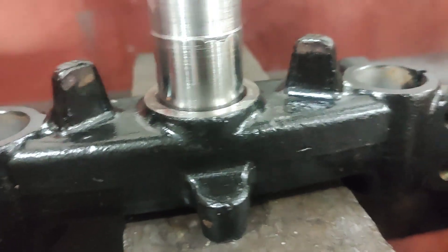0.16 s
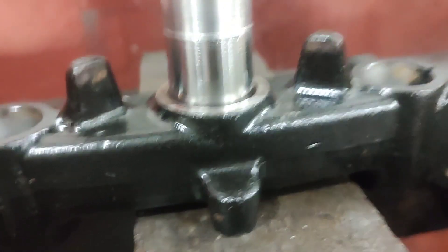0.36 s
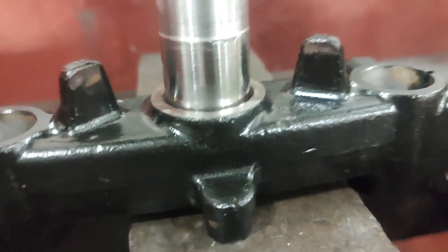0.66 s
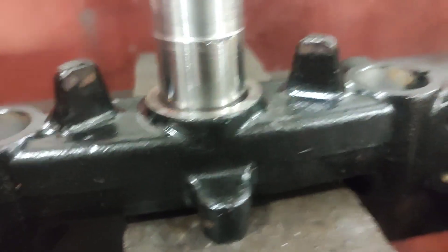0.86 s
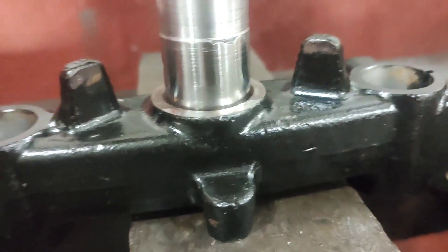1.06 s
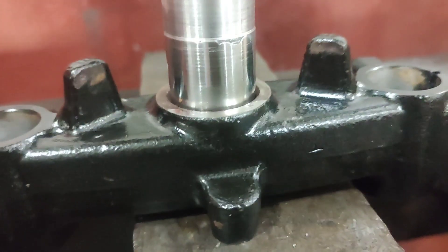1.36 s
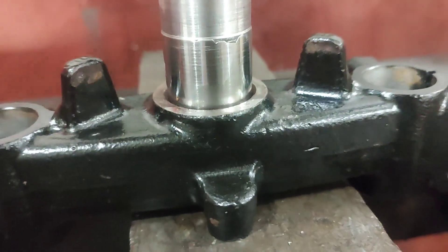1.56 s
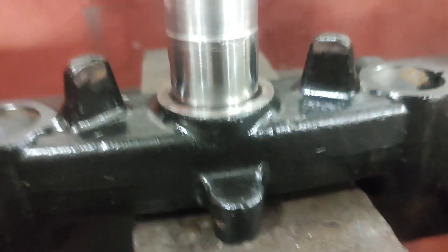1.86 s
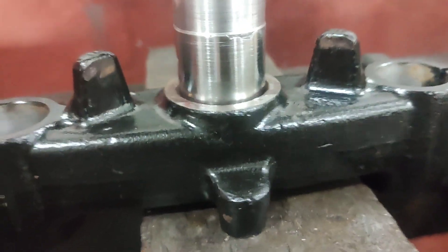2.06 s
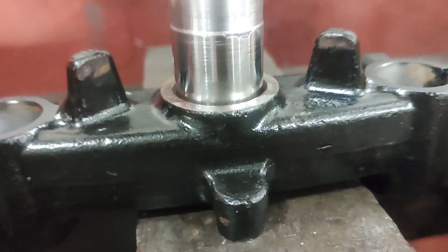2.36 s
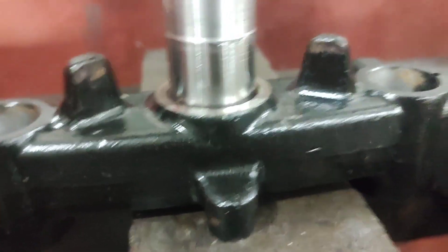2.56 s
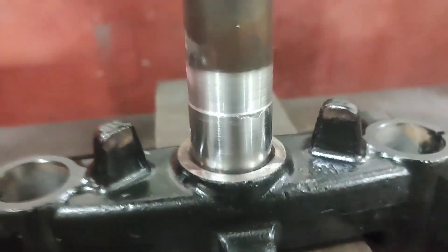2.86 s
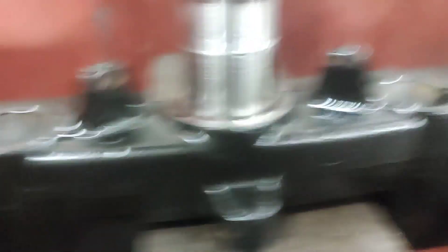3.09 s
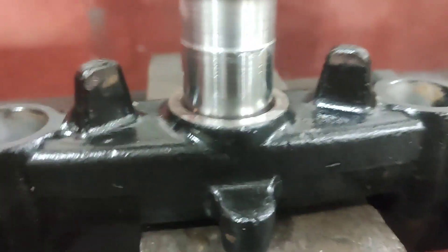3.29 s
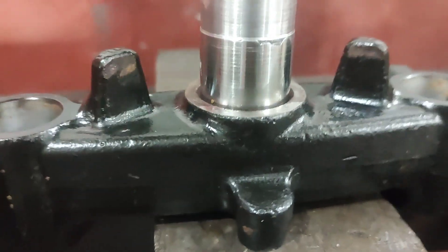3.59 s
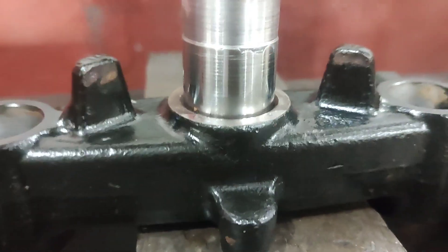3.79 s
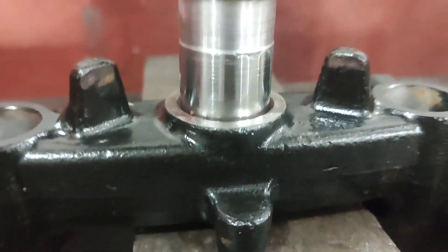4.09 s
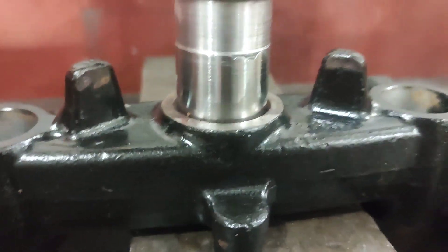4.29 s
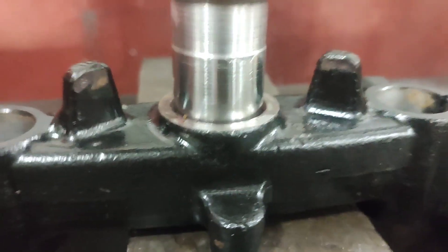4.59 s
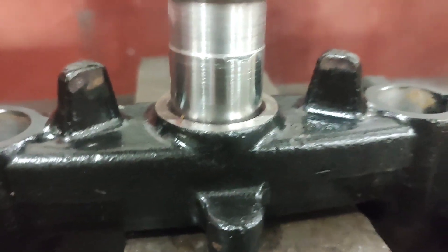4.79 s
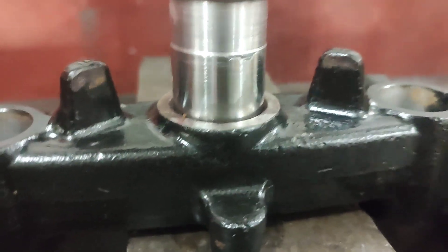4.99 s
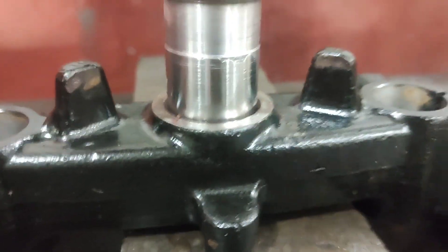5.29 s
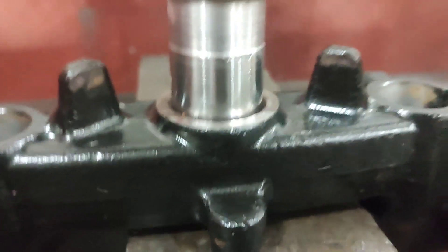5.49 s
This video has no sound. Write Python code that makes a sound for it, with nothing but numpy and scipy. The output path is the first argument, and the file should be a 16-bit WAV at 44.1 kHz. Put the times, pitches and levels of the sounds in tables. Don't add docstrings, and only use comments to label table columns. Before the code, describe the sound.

Steady metallic clack-crunch from a manually pumped press, heard near a phone in a reverberant shop. A slack tick leads into bright chattering clicks and a brief grinding shudder with a soft boom; a pipe handle then knocks its stop, hardest around the middle of the clip. Small stray ticks and wet rubbing fill the gaps over quiet drone, unsteady mains hum and rumble.

```python
import sys
import numpy as np
from scipy import signal
from scipy.fft import rfft, irfft, next_fast_len
from scipy.io import wavfile
from scipy.ndimage import uniform_filter1d

SR = 44100
rng = np.random.default_rng(int(sys.argv[2]) if len(sys.argv) > 2 else 0)


def store_wav(level_fs):
    pcm = np.round(np.clip(np.atleast_2d(level_fs), -1, 1) * 32767)
    wavfile.write(sys.argv[1], SR, pcm.T.astype(np.int16))


def field_ratio(decibels):
    return 10 ** (np.asarray(decibels, dtype=float) / 20)


N = 249165


def read(table, hz):
    table_hz, value = np.transpose(table)[:2]
    return np.interp(np.log(hz + 1), np.log(table_hz + 1), value)


def shape(x, gain_at):
    size = next_fast_len(x.shape[-1])
    return irfft(rfft(x, size) * gain_at(np.fft.rfftfreq(size, 1 / SR)), size)[..., :x.shape[-1]]


def unit(x):
    return x / np.sqrt(np.mean(x ** 2))


def band(x, lo_hz, hi_hz):
    return signal.sosfilt(signal.butter(2, [lo_hz, hi_hz], "band", fs=SR, output="sos"), x)


def add(out, s, sound):
    i = int(s * SR)
    out[..., i:i + sound.shape[-1]] += sound[..., :N - i]


def walk(rate):
    k = int(SR / rate)
    held = np.repeat(rng.standard_normal(N // k + 1), k)
    return uniform_filter1d(uniform_filter1d(held, k), k)[:N]


def ring(modes, seconds, scatter_db, detune, spread):
    hz, db, t60 = np.transpose(modes)[:, :, None]
    t = np.arange(int(seconds * SR)) / SR
    chance = rng.standard_normal((3, len(modes), 1))
    phase = 2 * np.pi * hz * (1 + detune * chance[0]) * t
    contact = 1 - np.exp(-t / 0.00065)
    size = field_ratio(db + scatter_db * chance[1]) * np.exp(-np.log(1000) * t / t60) * contact
    return np.array([np.sum(size * np.sin(phase + side * spread * chance[2]), axis=0) for side in (1, -1)])


def crack(low_db, high_db, pan_db):
    t = np.arange(int(.04 * SR)) / SR
    rise_s, tail_s = 0.002, 0.025
    u = t / rise_s
    swell = (u * np.exp(1 - u)) ** 2 + 0.26 * np.minimum(u, 1) * np.exp(-t / tail_s)
    chatter = rng.standard_normal(len(t)) + 1.15 * rng.standard_normal((2, len(t)))
    chatter = 0.31 * chatter * swell
    middle = band(band(chatter, 3300, 7700), 2500, 7900)
    low = band(chatter, 1400, 3500)
    high = band(band(chatter, 10000, 14500), 9800, 15000)
    high = .5 * high + band(high, 10200, 11200) + band(high, 12300, 13500)
    return field_ratio(0.43 * np.array([[pan_db], [-pan_db]])) * middle + field_ratio(low_db) * low + field_ratio(high_db) * high


def rush(u):
    swell = np.minimum(u / 0.46, 1) ** 1.07 * np.exp(-u)
    lump = int(.005 * SR)
    swell = swell * field_ratio(1.4 * np.sqrt(lump) * uniform_filter1d(rng.standard_normal(len(u)), lump))
    size = field_ratio(2.5 * np.minimum(rng.exponential(size=len(u)), 2))
    struck = rng.random(len(u)) < 3500 / SR
    jolts = rng.standard_normal(len(u)) * size * struck
    return swell, unit(jolts * swell)[None]


# frequency in Hz, level in dB per Hz
GRIT_COLOUR = [(180, 0), (300, -38), (560, 3.5), (706, -3), (1410, 5), (1630, 0.5), (2760, 3), (4600, -7.5),
               (7170, -18), (8740, -28), (10800, -32), (13900, -29), (15300, -48)]


def grind(swell, jolts, lo_hz):
    grains = jolts + 4 * swell * rng.standard_normal((2, len(swell)))
    return band(unit(shape(grains, lambda hz: field_ratio(read(GRIT_COLOUR, hz)))), lo_hz, 13000)


def valve_hiss(u):
    noise = band(band(rng.standard_normal((2, len(u))), 12450, 13000), 12400, 13050)
    return unit(np.minimum(u / 0.28, 1) * np.exp(-u / 3.5) * noise)


# frequency in Hz, level in dB, t60 in seconds
FRAME_MODES = [(250, -15.5, .15), (303.8, -7.5, 0.24), (383.4, -9.5, 0.17), (452, -8, 0.1), (503, -6, 0.12),
               (539, -2.5, 0.11), (609, -4.5, 0.087), (722.6, -7.5, 0.1), (810.4, 1, 0.063),
               (898, -2, 0.059), (1019, -0.5, 0.1), (1107, -5, 0.06), (1225, -2.5, 0.049),
               (1338, -4, 0.086), (1455, 1, 0.053)]


def frame_shudder(jolts, tilt_db):
    modes = [(hz, db + tilt_db * np.log2(hz / 700), 0.86 * t60) for hz, db, t60 in FRAME_MODES]
    return unit(signal.fftconvolve(jolts, ring(modes, .3, 1.5, .012, .45), axes=1))


def frame_roar(u):
    noise = band(rng.standard_normal(len(u)), 126.0, 203.7)
    return unit(np.minimum(u / 1.52, 1) ** 2 * np.exp(-u / 2.53) * noise)


# frequency in Hz, level in dB, t60 in seconds
BED_MODES = [(123, -3, 0.17), (169.6, -7, 0.17), (193.9, -0.5, 0.18), (213, -4.5, 0.19), (258, -25, .15)]


def bed_boom(boom_hz, low_db, upper_db):
    bed = [(hz, db + low_db * (k == 0) + upper_db * (k > 1), t60) for k, (hz, db, t60) in enumerate(BED_MODES)]
    push = np.hanning(int(.008 * SR))[None]
    modes = [(boom_hz, 2, .18), (.92 * boom_hz, -3, .12)] + bed
    boom = signal.fftconvolve(push, ring(modes, .3, 1.5, .01, .3), axes=1)
    boom = boom * (1 - np.exp(-np.arange(boom.shape[1]) / SR / .025))
    return unit(band(band(boom, 115.4, 274), 80, 420))


# start in seconds, peak in dB, 8-15 kHz part in dB,
# pin pitch in Hz, seal rub of the push in dB
BITES = [
    (0.2332, -16, -1.5, 5200, -45),
    (0.9546, -18.5, -13, 5430, -48.5),
    (1.6906, -13.5, -5.5, 7040, -44),
    (2.3702, -12.5, -5.5, 7560, -41),
    (3.08, -18.5, 6.5, 7130, -44.5),
    (3.8264, -7.5, -2, 7490, -40.5),
    (4.513, -13, -12, 2830, -44),
    (5.2078, -16, -2.5, 7290, -43),
]
# start in seconds, peak in dB, pin pitch in Hz,
# grit in dB, rattle in dB
RETURNS = [
    (0.6212, -25, 3190, -67, -30),
    (1.3432, -27.5, 3260, -57.5, -30.5),
    (2.0385, -24.5, 3290, -53, -37),
    (2.7163, -31.5, 2500, -57.5, -56),
    (4.1816, -24, 3380, -54, -41),
    (4.887, -27.5, 2750, -53.5, -52),
    (5.583, -21, 3350, -54, -32),
]
# start in seconds, boom in Hz, boom in dB, grit in dB, length in seconds
LOADS = [
    (0.259, 160, -43.5, -46.5, 0.012),
    (0.971, 166.2, -43, -49.5, 0.03),
    (1.684, 156.7, -44, -50, 0.016),
    (2.388, 186, -43.5, -42, 0.02),
    (3.101, 150.5, -46, -45.5, 0.028),
    (3.825, 142.7, -46, -44, 0.016),
    (4.514, 145.5, -39, -41, 0.023),
    (5.226, 150.3, -43, -42.5, 0.022),
]
# frame shudder in dB, valve hiss in dB against the grit
LOAD_PARTS = [(-41.5, -20), (-43.5, -35), (-41, -8), (-41.5, -12), (-40.5, -28), (-43, -22), (-42.5, -18),
              (-42.5, -16)]
# shudder lag in seconds, frame tilt in dB per octave,
# boom lag in seconds, lowest bed mode in dB, upper bed modes in dB
LOAD_ANSWERS = [(.004, -2, 0.00774, 4.5, -1), (.004, 1.3, 0.00785, 4, -2), (.003, 0, 0.0147, 5.5, -12),
                (.004, -0.4, 0.00766, 2, 4), (.004, -0.8, 0.0082, -1, 6), (.004, -0.9, .008, 1.5, 2),
                (.004, -1.5, 0.0081, -5, -6), (.004, -1.1, 0.00794, 4, 9.5)]
USUAL_ANSWER = (0.00404, 0.3, 0.0081, 0.28, 0.3)
# start in seconds, boom in Hz, boom in dB
REBOUNDS = [
    (0.331, 157, -53),
    (1.049, 162.4, -56.5),
    (3.18, 196.6, -51),
    (4.70, 196, -60),
]
# start in seconds, shudder in dB, grit in dB, boom in dB
SLIPS = [
    (.405, -49, -54, -67),
    (1.13, -50, -53.5, -63),
    (1.659, -54, -50.5, -52.5),
    (1.857, -52.5, -57.5, -71),
    (4.06, -59, -56, -68),
    (5.39, -52.5, -59.5, -63),
    (0.451, -58.5, -58.5, -70),
    (2.587, -58.5, -61.5, -74),
    (2.652, -62, -57, -71),
    (4.69, -58.5, -64, -67),
]


def jolt_list():
    grind_hz, scrape_hz, slip_hz, slip_s = 150, 1700, 149, .013
    lesser = (-43, USUAL_ANSWER)
    rows = []
    for (s, hz, db, grit, length), (shudder, oil), answer in zip(LOADS, LOAD_PARTS, LOAD_ANSWERS):
        rows.append((s, hz, db, shudder, grit, length, grind_hz, oil, answer))
    for s, hz, db in REBOUNDS:
        rows.append((s, hz, db, db - 7, db - 38, 0.013, grind_hz, *lesser))
    for s, shudder, grit, boom in SLIPS:
        rows.append((s, slip_hz, boom, shudder, grit, slip_s, grind_hz, *lesser))
    for s, *_ in BITES:
        rows.append((s + .003, 198.5, -57.5, -53, -45.5, slip_s, scrape_hz, *lesser))
    for s, _, _, grit, _ in RETURNS:
        rows.append((s, slip_hz, -84, -70, grit, 0.011, grind_hz, *lesser))
    return rows


def thuds():
    out = np.zeros((2, N))
    for s, boom_hz, boom_db, shudder_db, grit_db, length, lo_hz, oil_db, answer in jolt_list():
        shudder_lag, tilt_db, boom_lag, low_db, upper_db = answer
        u = np.arange(int(.2 * SR)) / SR / length
        swell, jolts = rush(u)
        add(out, s, field_ratio(grit_db + 2) * grind(swell, jolts, lo_hz))
        add(out, s, field_ratio(grit_db + oil_db) * valve_hiss(u))
        add(out, s + shudder_lag, field_ratio(shudder_db - 2.5) * frame_shudder(jolts, tilt_db))
        add(out, s + 0.01422, field_ratio(shudder_db - 2) * frame_roar(u))
        add(out, s + boom_lag, field_ratio(boom_db) * bed_boom(boom_hz, low_db, upper_db))
    return out


BITE_LOWS_DB = [-8, 0, -1.5, -16, -7, -5.5, -6, -3]
# start in seconds, peak in dB, 8-15 kHz part in dB, pin pitch in Hz
CHATTER = [(.2053, -28, -15, 3150), (0.229, -24, -13, 6950), (0.948, -32, 2, 4370), (1.653, -22, -7, 3060),
           (1.6809, -18.5, -10, 2680), (2.3638, -24, 5, 6550), (2.99, -38, -26, 6460),
           (3.09, -14, -7, 2720), (3.708, -32, -2.5, 4700), (3.741, -29, -9, 3300),
           (3.7994, -21.5, -4, 5300), (4.4937, -32, -22, 2780), (4.504, -32, -27, 4300),
           (5.2, -33, -12, 2790), (3.826, -15, -4, 5460)]
# start in seconds, peak in dB, pin pitch in Hz
TAPS = [(0.407, -39, 3190), (1.123, -40, 3130), (1.856, -38, 2780), (1.97, -43, 2670), (2.5879, -39, 2590),
        (2.651, -36.5, 2660), (2.342, -36, 3180), (4.786, -41.5, 3250), (3.344, -45, 2920),
        (4.061, -36, 3270), (5.4816, -36.5, 3360)]
# start in seconds, peak in dB, 8-15 kHz part in dB, pin pitch in Hz
STRAYS = [(.002, -43.5, -1, 6340), (0.451, -31, -7, 2580), (.605, -40, 1, 5300), (0.7403, -40.5, -26, 6550),
          (1.192, -36, -9, 3300), (1.285, -20, -14, 3470), (1.567, -40.5, -23, 2550),
          (2.803, -40.5, -2, 6940), (4.997, -31, -13, 3200), (4.087, -35.5, -20, 6710),
          (4.8133, -35.5, -21, 7060), (5.4355, -36, -7, 6750), (.529, -56, 5, 6500), (.578, -57, -26, 2700),
          (2.649, -40, -15, 5250), (4.847, -42, -20, 2920), (5.2325, -31, -12, 2800),
          (0.259, -23, -12, 2830)]
# start in seconds, peak in dB,
# 8-15 kHz part in dB, pin pitch in Hz
SNAPS = [
    (.616, -36.5, 5, 5800),
    (1.336, -39, 6, 5700),
    (2.032, -36, 4, 5330),
    (4.174, -36.5, 9, 5550),
    (4.8795, -37, 10, 5900),
    (5.575, -42, 6, 5450),
]


def ticks():
    rows = [(s, db, low, high, hz, -2) for (s, db, high, hz, _), low in zip(BITES, BITE_LOWS_DB)]
    rows += [(s, db, -18, high, hz, -0.5) for s, db, high, hz in CHATTER]
    rows += [(s, db, -25, -10.5, hz, 2) for s, db, hz, *_ in RETURNS]
    rows += [(s, db, 11, -18, hz, 6) for s, db, hz in TAPS]
    rows += [(s, db, -3, high, hz, 2) for s, db, high, hz in STRAYS + SNAPS]
    ring_db, t60, rise_s = -8.5, 0.026, 0.002
    out = np.zeros((2, N))
    for s, db, low_db, high_db, pin_hz, pan_db in rows:
        sound = crack(low_db + 1.5, high_db + 0.5, pan_db)
        sound = sound + field_ratio(-4) * band(sound, .85 * pin_hz, 1.15 * pin_hz)
        pin = ring([(pin_hz, ring_db, t60), (1.04 * pin_hz, ring_db - 4, t60)], .04, 1.5, .01, .6)
        rise = np.minimum(np.arange(pin.shape[1]) / SR / rise_s, 1)
        sound = sound + field_ratio(np.array([[pan_db], [-pan_db]]) / 2) * pin * rise
        add(out, s - .001, field_ratio(db) * sound)
    return out


# start in seconds, peak at 3.5-8 kHz in dB,
# 1.2-3.5 kHz part in dB, pin ring in dB, ring slope in dB per mode
CATCHES = [
    (0.151, -20, -5.5, -7, 1.5),
    (0.8731, -17, -16, -6.5, 3.5),
    (1.591, -19, 1, -6, 2.5),
    (2.2961, -24.5, -0.5, -8.5, 3.5),
    (3.0059, -17, 4.5, -11, 4.5),
    (3.7248, -22.5, 0.5, -8.5, 2),
    (4.4271, -20.5, -0.5, -7, 3.5),
    (5.138, -31.5, 12, -5, 4),
]
# frequency in Hz, width in Hz (not played), level in dB
SOCKET_PIN = [(1845, 137, 0.5), (2780, 106, 5.5), (4060, 100, 3.5), (5430, 105, -3), (6400, 160, -11),
              (7110, 87, -14)]
# start in seconds, level in dB, lower in Hz, upper in Hz
CATCH_TONES = [(0.1506, -17, 4040, 6440), (0.8724, -24, 3970, 6200), (1.5903, -25, 2785, 6270),
               (2.2967, -21.5, 2760, 4660), (3.0061, -20, 3170, 5300), (3.7244, -24, 4420, 7000),
               (4.4263, -21, 2820, 6850), (5.1367, -26, 2580, 7000)]


def catches():
    out, t60 = np.zeros((2, N)), .014
    for (s, db, low_db, ring_db, slope_db), (_, tone_db, lower_hz, upper_hz) in zip(CATCHES, CATCH_TONES):
        sound = crack(low_db, -18.5, 6)
        add(out, s - .001, field_ratio(db) * sound)
        modes = [(hz, mode_db + slope_db * k, t60) for k, (hz, _, mode_db) in enumerate(SOCKET_PIN)]
        add(out, s, field_ratio(db + ring_db - 7) * ring(modes, .04, 2.5, .04, .9))
        tones = [(lower_hz, 0, t60), (1.4 * lower_hz, -5, t60), (upper_hz, -2, t60)]
        add(out, s, field_ratio(tone_db - 5.5) * ring(tones, .04, 1, .003, .9))
        t = np.arange(sound.shape[1]) / SR
        add(out, s, field_ratio(db - 27.5) * np.sin(2 * np.pi * 970 * t) * np.exp(-t / 0.0019))
    return out


# frequency in Hz, t60 in seconds
HANDLE = [(2654, 0.072), (3910, 0.05), (5320, 0.04), (6830, 0.041)]
# frequency in Hz, level in dB against the mean main partial, t60 in seconds
HANDLE_MINOR = [(1630, 2, 0.017), (2130, 1, 0.0095), (3590, -1.5, 0.025), (5900, -25, 0.011),
                (8500, -19, 0.027), (10100, -22, 0.026), (12300, -16, 0.032), (13700, -21, .02)]
# start in seconds, level in dB of each of the four partials
KNOCKS = [
    (.537, -28.5, -36, -37, -49),
    (1.271, -28, -32, -26, -32),
    (2.0011, -36.5, -34.5, -43, -48),
    (2.682, -39, -31.5, -42, -50),
    (3.4136, -20, -17.5, -17, -21.5),
    (4.143, -26.5, -19.5, -27, -32),
    (4.831, -34.5, -42, -49, -44),
    (5.515, -31, -29, -22.5, -29),
]
# crack peak in dB, share of the free ring time, rebound delay in seconds,
# rebound in dB
LANDINGS = [
    (-56, 0.79, 0.0075, -13),
    (-28, .9, 0.0097, -4),
    (-33, 0.57, 0.015, -30),
    (-48, 0.38, 0.0074, -15),
    (-16, 0.91, 0.0097, -10),
    (-21.5, 0.29, .006, -12),
    (-50, 0.52, .015, -7),
    (-42, 0.85, 0.005, -7),
]


def knocks():
    cluster = ((1, 0.5), (1.017, -7.5), (.98, -10), (1.2, -17), (0.9, -15.5))
    out = np.zeros((2, N))
    for (s, *partial_db), (crack_db, share, delay, rebound_db) in zip(KNOCKS, LANDINGS):
        pairs = []
        for (hz, t60), db in zip(HANDLE, partial_db):
            pairs += [(hz * split, db + weak_db, share * t60) for split, weak_db in cluster]
        minor = [(hz, np.mean(partial_db) + db, t60) for hz, db, t60 in HANDLE_MINOR]
        for lag, db, tilt_db in ((0, 0, 0), (delay, rebound_db, -3.5)):
            modes = [(hz, mode_db + tilt_db * (hz / HANDLE[0][0] - 1) * 2, t60)
                     for hz, mode_db, t60 in pairs + minor]
            add(out, s + lag, field_ratio(db) * ring(modes, .1, .8, .003, .6))
            add(out, s + lag - .001, field_ratio(crack_db + db) * crack(-0.26, -15, 4.4))
    return out


def rattles():
    out = np.zeros((2, N))
    for s, _, hz, _, ring_db in RETURNS:
        for delay in np.cumsum(.007 * rng.random(7)):
            modes = [(hz * split, ring_db, .011) for split in (.82, .92, 1, 1.09, 1.2)]
            add(out, s + delay, np.exp(-delay / .025) * ring(modes, .04, 3, .02, .9))
    return out


LIFT_RUB_DB = -50


def rubbing(t):
    earlier = field_ratio(-51.5) * np.exp(-t / 0.1)
    power = field_ratio(-57.5) ** 2 + earlier ** 2
    for catch, bite, load, knock in zip(CATCHES, BITES, LOADS, KNOCKS):
        slack = uniform_filter1d(1. * (t > catch[0]) * (t < load[0]), size=900)
        u = np.maximum(t - load[0], 0)
        push = field_ratio(bite[4] + 6) * (1 - np.exp(-u / 0.0013)) * np.exp(-u / 0.1)
        lift = field_ratio(LIFT_RUB_DB) * np.exp(-((t - knock[0] - 0.058) / 0.1) ** 2)
        power = power + field_ratio(-51) ** 2 * slack + push ** 2 + lift ** 2
    return np.sqrt(power)


# low edge in Hz, high edge in Hz, level in dB
CLUMP_BANDS = [(500, 1130, -1.5), (1000, 2300, -7.5), (2170, 3940, -1.5), (4770, 10000, -12)]


def crackle(strength):
    per_s, scatter_db, clump_s = 160, 1.5, 0.0028
    out = 0
    for lo_hz, hi_hz, db in CLUMP_BANDS:
        chance = rng.random((int(per_s * N / SR), 2))
        snaps = np.zeros(N)
        snaps[(chance[:, 0] * N).astype(int)] = field_ratio(-scatter_db * np.log(1 - .95 * chance[:, 1]))
        fade = np.exp(-1 / (clump_s * SR))
        bursts = signal.lfilter([1], [1, -2 * fade, fade ** 2], snaps) * rng.standard_normal(N)
        out = out + field_ratio(db) * unit(band(bursts, lo_hz, hi_hz))
    loaded = np.sqrt(np.maximum(strength ** 2 - 2 * field_ratio(LIFT_RUB_DB) ** 2, 0))
    return field_ratio(-5) * loaded * np.array([out, out])


# frequency in Hz, left minus right in dB
PORT_DB = [(60, 2), (110, 2.5), (200, -2), (380, 4.5), (690, -1.5), (1280, -1.5), (2360, 2.5), (4360, 2.5),
           (8040, -10.5), (11000, -8.5), (14800, 5)]
# frequency in Hz, radians by which left leads
PORT_PHASE = [(0, 0), (600, 0.1), (860, -0.6), (1380, 4.0), (1980, 3.2), (2580, 7.4), (3270, 6.6),
              (4740, 7.1), (5250, 6.1), (6370, 6.3), (7670, 6.2), (8350, 6.3), (14100, 6.3), (15000, 5.9)]


def ports(x):
    def half(hz):
        return field_ratio(read(PORT_DB, hz) / 2) * np.exp(.5j * read(PORT_PHASE, hz))
    return np.array([shape(x[0], half), shape(x[1], lambda hz: 1 / half(hz))])


# frequency in Hz, likeness of the ports from 0 to 1
LIKENESS = [(60, 0.94), (200, 0.92), (600, 0.57), (1200, 0), (8000, 0.56), (13000, 0.9)]


def diffuse(size):
    mid, side = rng.standard_normal((2, size))
    mid = shape(mid, lambda hz: np.sqrt((1 + np.clip(read(LIKENESS, hz), 0, 1)) / 2))
    side = shape(side, lambda hz: np.sqrt((1 - np.clip(read(LIKENESS, hz), 0, 1)) / 2))
    return np.array([mid + side, mid - side])


# frequency in Hz, echo t60 in seconds
ROOM_T60 = [(100, 0.59), (300, 0.85), (800, 0.61), (2000, 0.57), (5000, 0.67), (12000, 0.55)]
# frequency in Hz, echo level in dB
ROOM_DB = [(100, 4), (600, 4.5), (2500, 3), (6000, -1), (9000, -13), (13000, -5.5)]


def room(x):
    t = np.arange(int(.9 * SR)) / SR
    noise, tail = diffuse(len(t)), 0
    for hz in 62.5 * 2. ** np.arange(8):
        middle_hz = hz * 2 ** .5
        fade = np.exp(-np.log(1000) * t / read(ROOM_T60, middle_hz))
        level = field_ratio(read(ROOM_DB, middle_hz)) / np.sqrt(np.sum(fade ** 2))
        tail = tail + level * band(noise, hz, 2 * hz) * fade
    tail = tail * np.clip((t - .003) / 0.016, 0, 1)
    return signal.fftconvolve(tail, x[None], axes=1)[:, :N]


# time in seconds, rumble level in dB
RUMBLE = [(0.0, -39), (0.05, -50), (0.41, -49), (0.49, -41), (0.52, -47), (1.79, -54), (2.0, -44.5),
          (2.3, -59), (2.6, -48.5), (4.45, -55), (4.74, -50), (5.07, -59), (5.43, -45.5), (5.65, -46)]
# time in seconds, hum level in dB
HUM = [(0.0, -42.5), (0.91, -48), (1.18, -40.5), (1.32, -61.5), (1.38, -48), (1.67, -53), (1.72, -41),
       (2.16, -52), (2.69, -45.5), (3.08, -57), (3.34, -46.5), (3.51, -59), (3.59, -44), (3.79, -51.5),
       (3.84, -43), (4.0, -53.5), (4.74, -49.5), (5.65, -52)]
# frequency in Hz, level in dB per Hz
SHOP = [(68, -26), (115, 4.5), (241, -7.5), (387, 0.5), (445, -10.5), (501, 2), (552, -9), (602, -14.5),
        (858, -17), (1500, -65), (1950, -105), (3300, -120)]
# frequency in Hz, level in dB per Hz
RUB = [(350, -37), (600, 1.5), (651, -6.5), (1210, -6), (1450, -6), (2140, -5.5), (2740, -8), (4400, -12.5),
       (6780, -20.5), (8420, -27), (13200, -25.5), (14100, -29), (15300, -68)]


def background(strength):
    t = np.arange(N) / SR
    rub = strength * field_ratio(2.5 * walk(25)) * unit(shape(diffuse(N), lambda hz: field_ratio(read(RUB, hz))))
    hum_db = np.interp(t, *np.transpose(HUM)) + 1.55 * walk(9.1)
    mains = np.sin(2 * np.pi * 100 * t + 2.75 * walk(12))
    hum = field_ratio(hum_db) * (mains + 0.25 * unit(band(diffuse(N), 96.5, 97.2)))
    drone = field_ratio(-55 + 2 * walk(2.63)) * unit(shape(diffuse(N), lambda hz: field_ratio(read(SHOP, hz))))
    rumble_db = np.interp(t, *np.transpose(RUMBLE))
    rumble = field_ratio(rumble_db) * unit(band(band(diffuse(N), 32.3, 63), 34.5, 103))
    return rumble + hum + drone + rub


# start in seconds, slow sway in Hz, level in dB, t60 in seconds
JOGS = [
    (3.519, 13, -32, 0.44),
]


def jogs():
    out, t = np.zeros((2, N)), np.arange(SR // 2) / SR
    for s, hz, db, t60 in JOGS:
        add(out, s, -field_ratio(db) * np.sin(2 * np.pi * hz * t) * np.exp(-np.log(1000) * t / t60))
    return out


def scene():
    press = ticks() + catches() + rattles() + thuds()
    handle = knocks() * field_ratio(2 * np.array([walk(330), walk(330)]))
    echo = room((press + .7 * handle).mean(axis=0))
    strength = rubbing(np.arange(N) / SR)
    return ports(press + handle + crackle(strength)) + echo + background(strength) + jogs()


# frequency in Hz, threshold in spreads
DROPOUT = [(8000, .2), (8500, -.2), (8900, -.6), (9600, -.6), (11000, -1.3), (11900, -.6), (12800, -2),
           (13500, -1.3), (14050, .1), (14600, 3)]


def flicker(x):
    frame, strip_hz, floor_hz, size = 1024, 400, 7900, next_fast_len(N)
    spectrum, hz = rfft(x, size), np.fft.rfftfreq(size, 1 / SR)
    out = irfft(spectrum * (hz < floor_hz), size)[:, :N]
    power = np.mean(band(x, 3000, 15000) ** 2, axis=0)
    attack = uniform_filter1d(power, 130) > 6 * uniform_filter1d(power, 2500, origin=1000)
    spared = np.clip(8 * uniform_filter1d(1. * attack, 300), 0, 1)
    for lo in np.arange(floor_hz, 15700, strip_hz):
        chance = uniform_filter1d(rng.standard_normal((2, N // frame + 1)), 3) * 3 ** .5
        kept = (chance[0] > read(DROPOUT, lo)) * field_ratio(3.5 * chance[1])
        kept = uniform_filter1d(np.repeat(kept, frame)[:N], 200)
        strip = irfft(spectrum * (hz >= lo) * (hz < lo + strip_hz), size)[:, :N]
        out = out + strip * (spared + (1 - spared) * kept)
    return out


def band_limit(x):
    return signal.sosfilt(signal.butter(12, 15440, fs=SR, output="sos"), x)


def record(dry):
    cut = signal.sosfilt(signal.butter(10, 14800, fs=SR, output="sos"), dry)
    dip_hz, dip_width_hz, dip_db = 8100, 760, -2.5
    cut = shape(cut, lambda hz: field_ratio(dip_db * np.exp(-((hz - dip_hz) / dip_width_hz) ** 2)))
    return band_limit(flicker(cut))


dry = scene()
out = record(dry)
store_wav(out)
```